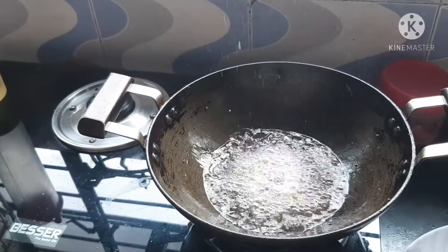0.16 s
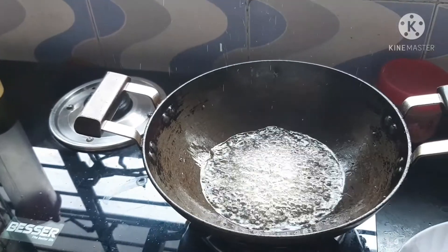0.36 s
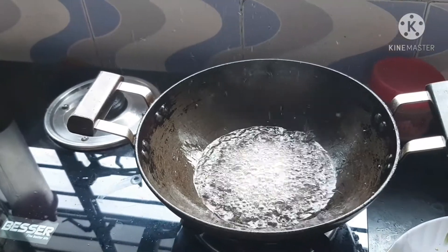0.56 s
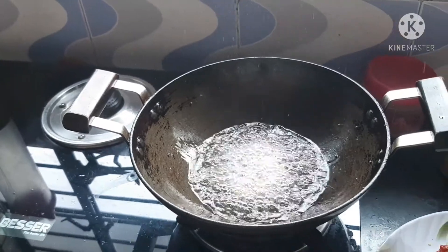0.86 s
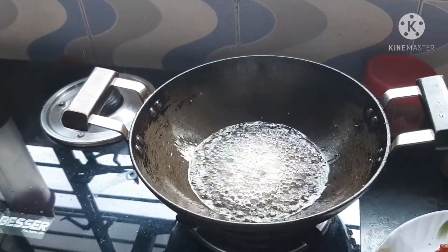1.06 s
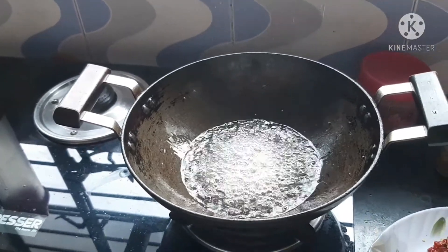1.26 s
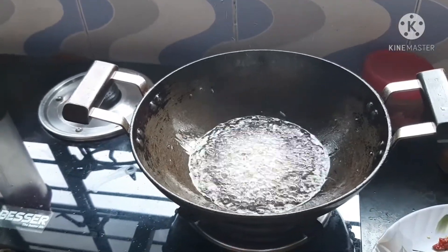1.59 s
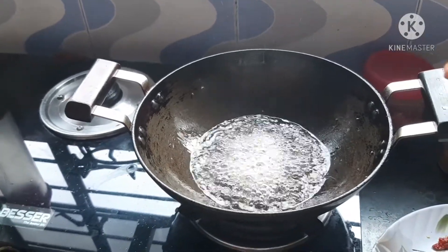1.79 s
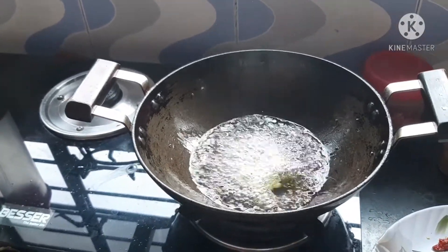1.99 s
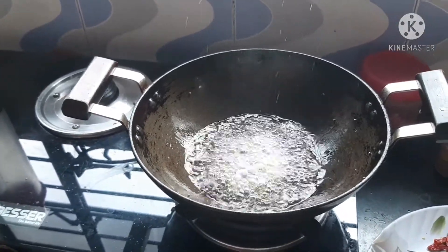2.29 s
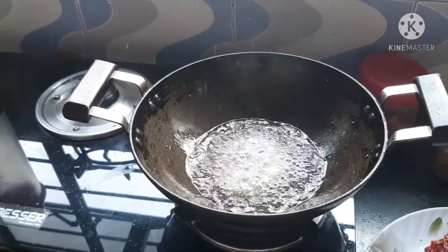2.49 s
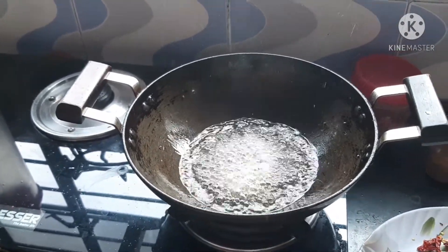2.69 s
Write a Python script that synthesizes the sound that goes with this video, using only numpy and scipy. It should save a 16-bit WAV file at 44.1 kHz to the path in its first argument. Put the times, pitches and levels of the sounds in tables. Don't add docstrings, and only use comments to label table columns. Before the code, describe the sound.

Hot oil frying in a wok, sharp irregular crackles and pops over a faint fizzing hiss

```python
import sys
import numpy as np
from scipy import signal
from scipy.fft import irfft
from scipy.io import wavfile
from scipy.ndimage import uniform_filter1d, map_coordinates

SR = 44100
rng = np.random.default_rng(int(sys.argv[2]) if len(sys.argv) > 2 else 0)


def int16_out(signal):
    q = np.round(np.clip(np.atleast_2d(signal).T, -1, 1) * 32767)
    wavfile.write(sys.argv[1], SR, q.astype(np.int16))


def to_linear_factor(level_db):
    exponent = np.asarray(level_db, float) / 20
    return 10 ** exponent


N = 125685

SIDES = np.array([[1], [-1]])
PORT_LAG_S = 0.00013


def at_hz(points, hz):
    table = np.array(points)
    return np.interp(np.log(hz), np.log(table[:, 0]), table[:, 1])


def rms_one(x):
    return x / np.sqrt(np.mean(x ** 2) + 1e-20)


def drift(rate):
    knots = rng.standard_normal(400)
    return map_coordinates(knots, [np.arange(N) / SR * rate], order=3)


def bands():
    edges = 28 * 2 ** np.arange(0, 9.6, 0.5)
    return [(np.sqrt(low * high), signal.butter(2, [low, high], "band", fs=SR, output="sos"))
            for low, high in zip(edges, edges[1:])]


def place(seconds, shapes):
    out = np.zeros((2, N + SR))
    for s, shape in zip(seconds, shapes):
        i = int(s * SR)
        out[:, i:i + shape.shape[-1]] += shape
    return out[:, :N]


def fizz():
    # time in seconds, level in dB.
    frying_vigour = [(0, -44), (.3, -44), (.75, -46.5), (1.1, -48.5), (1.4, -47), (1.8, -47.5),
                     (2.15, -46.5), (2.5, -49), (2.85, -48.5)]
    # frequency in Hz, density in dB per Hz.
    fizz_colour = [(600, -16), (900, -4), (2000, -12.5), (3500, -1), (6000, -7.5), (9000, -19.5),
                   (14000, -32)]
    bubbles_per_s, size_spread_db, ring_cycles = 2500, 3.5, 8
    clump_db, clumps_per_s = 3, 35
    s, db = np.transpose(frying_vigour)
    vigour_db = np.interp(np.arange(N) / SR, s, db)
    sizes = to_linear_factor(size_spread_db * np.minimum(rng.exponential(1, N), 3.0)) * rng.choice([-1, 1], N)
    born = rng.random(N) < bubbles_per_s * to_linear_factor(clump_db * drift(clumps_per_s)) / SR
    pitches = np.geomspace(650, 14000, 40)
    dealt = rng.integers(0, 40, N)
    lags = (PORT_LAG_S * SR * rng.uniform(-0.26, 1, pitches.size)).round().astype(int)
    out = 0
    for k, hz in enumerate(pitches):
        r = to_linear_factor(-60 * hz / ring_cycles / SR)
        w = 2 * np.pi * hz / SR
        poles = [1, -2 * r * np.cos(w), r * r]
        rung = signal.lfilter([1, 0, -1], poles, sizes * born * (dealt == k) + 1e-18)
        rung = signal.lfilter([1 - r * r], poles, rung) * np.sin(w)
        out = out + to_linear_factor(at_hz(fizz_colour, hz)) * hz * np.stack([rung, np.roll(rung, lags[k])])
    return to_linear_factor(vigour_db - 1) * rms_one(out)


def flame():
    # frequency in Hz, density in dB per Hz.
    flame_colour = [(40, -17), (110, -4), (400, -3), (640, -3.5), (850, -24), (2000, -3), (4000, -5),
                    (16000, -33)]
    alike, flicker_db = 0.55, 1.2
    white = rng.standard_normal((2, 2, N))
    out = 0
    for k, (hz, sos) in enumerate(bands()):
        mid, side = signal.sosfilt(sos, white[k % 2])
        gain = to_linear_factor(at_hz(flame_colour, hz) + flicker_db * drift(8.8))
        out = out + gain * (np.sqrt(1 + alike) * mid + np.sqrt(1 - alike) * side * SIDES)
    return to_linear_factor(-57) * rms_one(out)


def bubbles(rows):
    gain_db, rise_ms, ring_scale = 5, 0.15, 0.51
    glide, twin_detune, twin_db = 0.04, 0.2, -7
    snap_db, snap_fall_ms = -27, 0.42
    s, db, hz, ring_ms = np.array(rows).T[:, :, None, None]
    luck = rng.uniform(-0.9, 1, (len(s), 4, 1, 1))
    lag_s = PORT_LAG_S * (luck[:, 3] * SIDES - 1) / 5
    ms = np.maximum(np.arange(600) / SR + lag_s, 0) * 1000
    turns = hz * ms / 1000 * (1 + glide * (ms / ring_ms - 1))
    twin_phase = 2 * np.pi * turns * (1 + twin_detune * luck[:, 0]) + np.pi * luck[:, 1]
    tone = np.sin(2 * np.pi * turns) + to_linear_factor(twin_db) * np.sin(twin_phase)
    tone = tone * (1 - np.exp(-ms / rise_ms)) ** 2 * np.exp(-ms / (ring_scale * ring_ms))
    bright_noise = np.diff(rng.standard_normal((len(s), 2, 601)))
    snap = to_linear_factor(snap_db) * bright_noise * np.exp(-ms / snap_fall_ms)
    return place(s.ravel(), to_linear_factor(db + gain_db + luck[:, 2] * SIDES) * (tone + snap))


def ringing(rows):
    ring_cycles = 3.61
    return [(s, db, hz, 1000 * ring_cycles / hz) for s, db, hz in rows]


def steam_bubbles():
    # start in seconds, peak in dB, pitch in Hz, ring time in ms.
    own_ring_bubbles = [(0.0071, -23.5, 2480, 1.04), (0.0101, -45, 2360, 0.99), (0.1124, -16, 3060, 0.75),
                        (0.1795, -31.5, 2400, 4.7), (0.2357, -19, 3170, 1.37), (0.2394, -18.5, 3190.0, 1.7),
                        (0.2581, -10, 3070, 0.61), (0.2694, -9.5, 2580, 0.46), (0.2754, -9, 2710, 0.3),
                        (0.3519, -34, 2620, 5.5), (0.4691, -20, 3360, 1.43), (0.4741, -26.5, 2750, 1.7),
                        (0.8384, -21.5, 2130, 1.53), (0.8803, -23, 3020, 2.9), (1.0415, -13.5, 3130, 0.86),
                        (1.0729, -23.5, 2840, 3), (1.1313, -33, 3370, 2.7), (1.3319, -20, 2600, 0.68),
                        (1.5272, -27, 3000, 1.03), (1.6192, -19.5, 2780, 1.4), (1.7189, -23.5, 2940, 0.9),
                        (1.9389, -21, 2760, 1), (2.0617, -36.5, 2830, 3.6), (2.0881, -31, 2545, 5.8),
                        (2.1348, -29, 3480, 2.2), (2.2285, -24.5, 2840, 4.7), (2.2313, -24, 3470, 2.05),
                        (2.3565, -17, 3270, 1.5), (2.4287, -26.5, 2810, 3.4), (2.6203, -27, 2940, 1.6)]
    # start in seconds, peak in dB, pitch in Hz.
    mixed_bubbles = [(0.1344, -29, 2230), (0.1651, -21.5, 3140), (0.1675, -33.5, 1460),
                     (0.4602, -26, 3940), (0.5635, -29.0, 3900), (0.6017, -15.5, 3630),
                     (0.8105, -31.5, 3650), (0.8646, -20.5, 3500), (1.0251, -25, 2550),
                     (1.07, -17.5, 3270), (1.1788, -19.5, 4050), (1.2056, -31, 2860), (1.2989, -29, 2450),
                     (1.5308, -22.5, 3500), (1.5312, -40.5, 990), (1.5929, -30, 3600),
                     (1.6451, -16.5, 3730), (1.9064, -29, 3320), (1.9896, -15, 4000), (2.2171, -36, 3300),
                     (2.256, -29.5, 2080), (2.28, -36.5, 1054), (2.3286, -26, 3520), (2.7494, -30, 3430),
                     (0.1182, -14.5, 5070), (0.1247, -15, 4120), (0.1699, -12, 4760), (0.2084, -21, 5700),
                     (0.2162, -17.5, 3970), (0.2662, -16, 4400), (0.4435, -39, 4360.0), (0.587, -33, 4330),
                     (0.707, -27, 5270), (0.828, -23, 5100), (0.961, -28.5, 4260), (0.9887, -21, 4060),
                     (1.264, -25, 4080), (1.7459, -26.5, 5240), (1.804, -52, 5200.0), (2.0446, -24.5, 5360),
                     (2.0776, -15, 4360), (2.1822, -19.5, 5100), (2.1902, -25, 3920.0),
                     (2.3892, -14.5, 6460), (2.54, -23.5, 5130), (2.632, -18.5, 4900), (2.659, -16, 4030),
                     (2.822, -24, 4320),
                     (0.091, -43, 2900), (0.0974, -48, 4600), (0.126, -22, 4500), (0.1708, -15, 2940),
                     (0.181, -17, 5000), (0.2414, -28, 3200), (0.5357, -30, 3700), (0.7721, -37, 4260),
                     (1.3322, -26.5, 4040), (1.3668, -38, 2590), (1.395, -41.5, 1300), (1.452, -24, 3700),
                     (1.476, -29, 4500), (1.5155, -30, 4630), (1.563, -31, 5700), (1.593, -43.5, 930),
                     (1.676, -39, 1480), (1.7075, -35, 2680), (1.719, -25, 4500), (1.72, -40.5, 926),
                     (1.8307, -40, 5850), (1.887, -44, 3280), (1.8933, -44, 3260), (1.929, -35, 5800),
                     (2.3176, -41, 3490), (2.3773, -29, 3560), (2.401, -29.5, 3300), (2.4727, -31, 3250),
                     (2.5082, -41, 2600), (2.5405, -26.5, 2560), (2.579, -30, 4400), (2.6063, -22, 4140),
                     (2.678, -23, 5170), (2.7751, -35, 3400), (2.799, -34, 4420)]
    return bubbles(own_ring_bubbles) + bubbles(ringing(mixed_bubbles))


def kitchen(x):
    # frequency in Hz, time to fall 60 dB in seconds.
    room_t60 = [(300, 0.17), (1200, 0.47), (3500, 0.17), (8000, 0.27), (15000, 0.22)]
    # frequency in Hz, level in dB.
    room_db = [(300, -6), (1200, -8), (3000, -4), (6000, -5), (10000, -3.5), (15000, -6.5)]
    build_ms, bowl_db, bowl_t60_s = 2.45, -11, 0.012
    t = np.arange(SR // 2) / SR
    white = rng.standard_normal((2, 2, t.size))
    tail = 0
    for k, (hz, sos) in enumerate(bands()):
        fade = to_linear_factor(-60 * t / at_hz(room_t60, hz)) * (1 - np.exp(-1000 * t / build_ms))
        fade = fade / np.sqrt(np.sum(fade ** 2))
        tail = tail + to_linear_factor(at_hz(room_db, hz)) * signal.sosfilt(sos, white[k % 2]) * fade
    echoes = to_linear_factor(-60 * t / bowl_t60_s) * (t > 0.001) * (rng.random(t.size) < 0.05)
    echoes = echoes / np.sqrt(np.sum(echoes ** 2))
    bowl = to_linear_factor(bowl_db) * (white[0, :1] + 0.5 * white[1]) * echoes
    return signal.fftconvolve(x[None], tail + bowl, axes=1)[:, :N]


def water_spits():
    # start in seconds, peak in dB, pitch in Hz.
    spit_events = [(0.0952, -48, 8000), (0.1179, -14.5, 10200), (0.1263, -16, 11600), (0.1453, -5, 13000),
                   (0.2086, -16, 12600), (0.2395, -25, 8900), (0.2755, -16.5, 12200), (0.3636, -34, 9100),
                   (0.4603, -14.5, 14000), (0.4743, -10, 11700), (0.5342, -35, 8000), (0.5641, -38, 8000),
                   (0.6017, -8.5, 12200), (0.6034, -11, 12000), (0.6141, -11.5, 11000),
                   (0.6195, -20, 11000), (0.7073, -32, 7000), (0.7756, -36, 10200), (0.791, -29, 13000),
                   (0.8281, -24, 7900), (0.8348, -35, 12100), (0.8629, -27, 7950), (0.8804, -35, 8000),
                   (1.0151, -37, 10100), (1.0397, -22, 13100), (1.07, -26, 7300), (1.1788, -24.5, 13700),
                   (1.2336, -46, 12200), (1.2506, -35, 11000), (1.3119, -44, 8000), (1.3254, -37, 12000),
                   (1.4351, -45, 7900), (1.45, -13, 11700), (1.51, -23, 13000), (1.5748, -35, 8000),
                   (1.6129, -7.5, 12700), (1.939, -26.5, 9500), (1.9896, -21, 8000), (2.0485, -30, 12000),
                   (2.0587, -8.5, 8700), (2.0776, -12, 11400), (2.2199, -24.5, 11600), (2.2922, -36, 8450),
                   (2.3411, -11.5, 11300), (2.3905, -25, 12000), (2.5267, -38, 11400), (2.5571, -40, 10000),
                   (2.606, -31, 12600), (2.6314, -21, 8600), (2.659, -23, 7000), (2.7985, -42, 8000)]
    width_octaves, body_db, raggedness = 0.34, 0, 0.69
    lead_ms, lag_ms = 0.4, 0.0504
    s, db, hz = np.array(spit_events).T[:, :, None, None]
    f = np.linspace(1, SR / 2, 129)
    luck = rng.standard_normal((len(s), 3, f.size))
    peak = np.exp(-0.5 * (np.log2(f / hz) / width_octaves) ** 2)
    body = to_linear_factor(body_db) * f ** 2 / (f ** 2 + 1200 ** 2)
    delay_ms = lead_ms + lag_ms * luck[:, :1, :1] * SIDES
    ragged = raggedness * 3 * uniform_filter1d(luck[:, :1] + 0.5 * luck[:, 1:], size=9)
    phase = ragged + np.pi * luck[:, :1, 1:2] - 2 * np.pi * f * delay_ms / 1000
    burst = irfft((peak + body) * np.exp(1j * phase))
    burst /= np.sqrt((burst ** 2).sum(axis=2, keepdims=True) / 10)
    return place(s.ravel() - lead_ms / 1000, to_linear_factor(db + 2) * burst)


def thumps():
    # start in seconds, level in dB, fall time in ms.
    kick_events = [
        (0.1454, -12.5, 0.22),
        (0.4745, -18, 0.29),
        (0.6009, -35, 0.4),
        (0.6206, -31, 0.51),
        (1.613, -7, 1),
        (2.059, -42, 0.39),
    ]
    lead_ms, lead_db, right_db, right_slower = 0.4, -1.5, -7.5, 1.4
    s, db, fall_ms = np.array(kick_events).T[:, :, None]
    ms = np.arange(1500) / SR * 1000
    late = ms - lead_ms
    push = to_linear_factor(lead_db) * np.sin(np.pi * ms / lead_ms)
    left = np.where(late < 0, push, -np.exp(-late / fall_ms))
    right = to_linear_factor(right_db) * (late > -lead_ms / 2) * np.exp(-late / (right_slower * fall_ms))
    kicks = place(s[:, 0] - lead_ms / 1000, to_linear_factor(db)[:, None] * np.stack([left, right], axis=1))
    return signal.sosfilt(signal.butter(2, 79, "high", fs=SR, output="sos"), kicks)


def scene():
    spit_wet_db, fizz_wet_db, left_db = -1.5, 2, 0.66
    low_cut = signal.butter(2, 500, "high", fs=SR, output="sos")
    air_cut = signal.cheby1(8, 1, 15700, fs=SR, output="sos")
    tiny = fizz()
    pops, spits = signal.sosfilt(low_cut, [steam_bubbles(), water_spits()])
    sent = pops[0] + to_linear_factor(spit_wet_db) * spits[0] + to_linear_factor(fizz_wet_db) * tiny[0]
    diffuse = tiny + kitchen(sent) + flame()
    wok = pops + spits + signal.sosfilt(air_cut, diffuse)
    return wok * to_linear_factor(left_db * SIDES) + thumps()


def band_limit(x):
    return signal.sosfilt(signal.butter(12, 16650, fs=SR, output="sos"), x)


def record(dry):
    ceiling = 0.85
    low_cut = signal.butter(1, 60, "high", fs=SR, output="sos")
    top_cut = signal.cheby2(10, 60, 16700, fs=SR, output="sos")
    rounded = ceiling * np.tanh(dry / ceiling)
    return band_limit(signal.sosfilt(np.r_[low_cut, top_cut], rounded))


dry = scene()
out = record(dry)
int16_out(out)
```